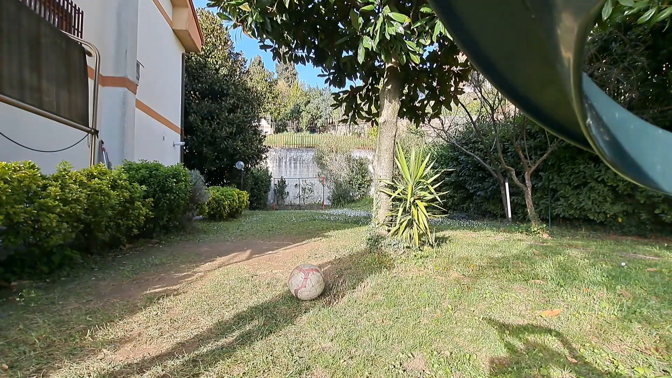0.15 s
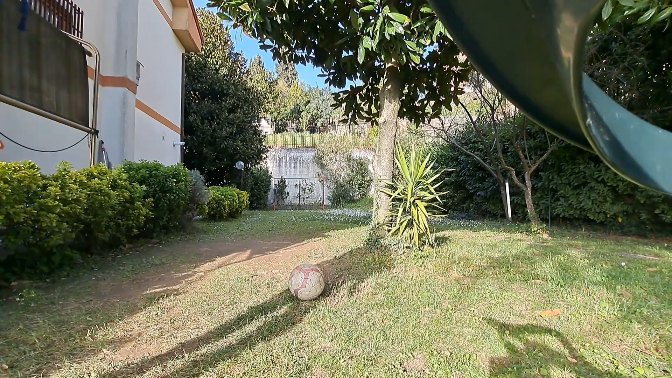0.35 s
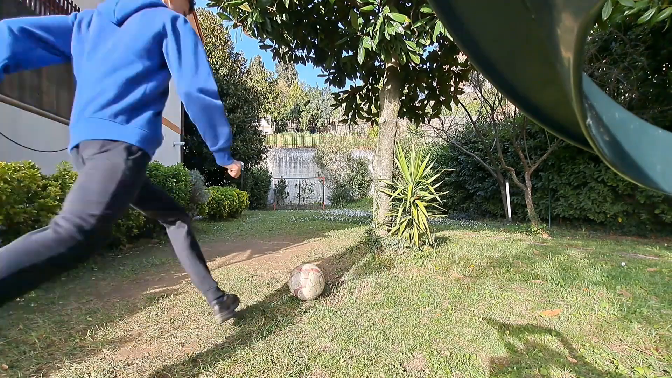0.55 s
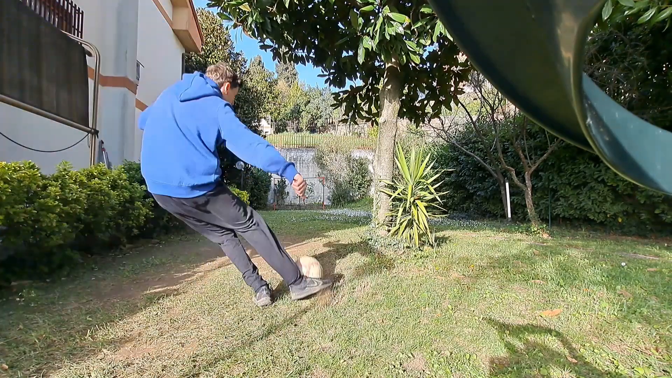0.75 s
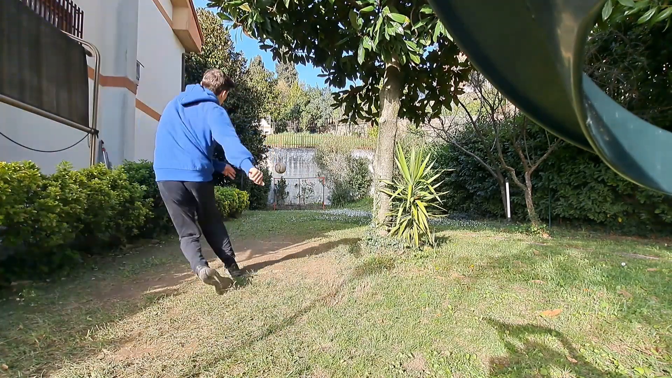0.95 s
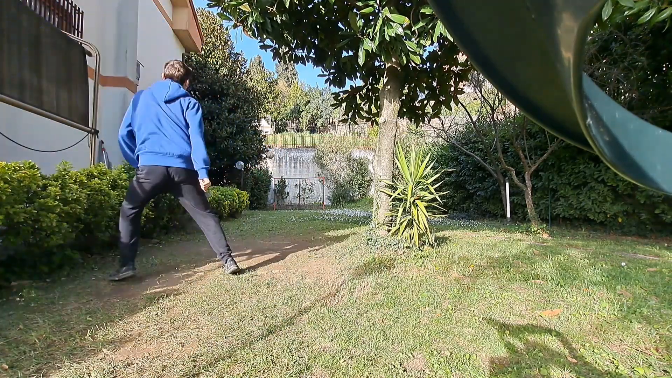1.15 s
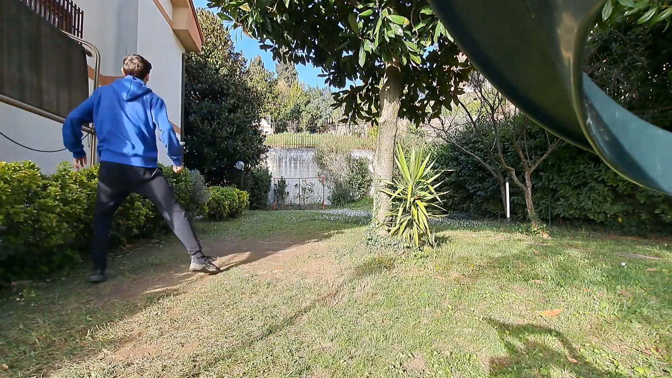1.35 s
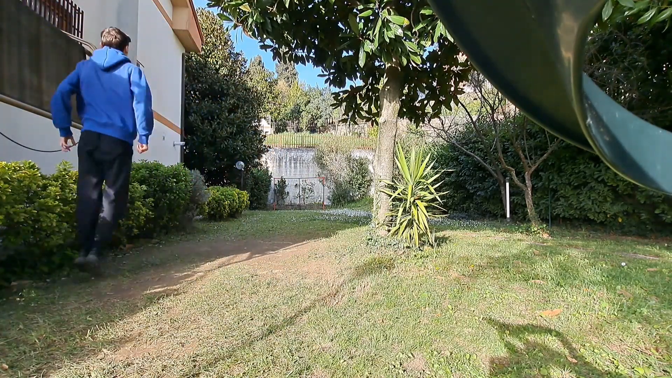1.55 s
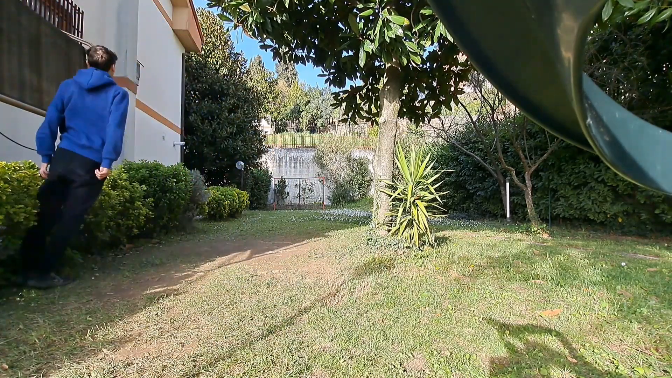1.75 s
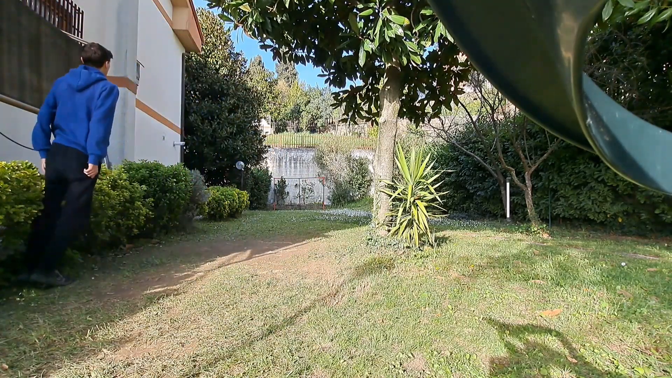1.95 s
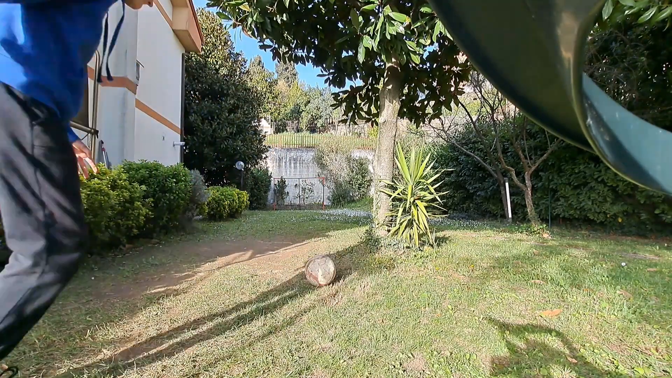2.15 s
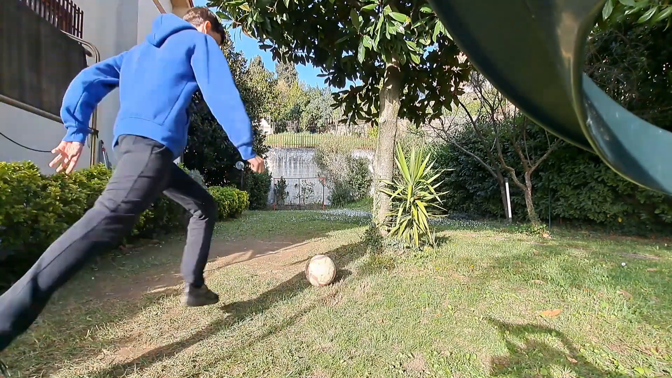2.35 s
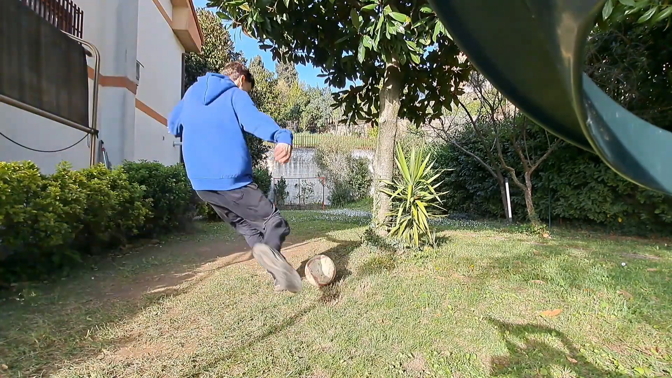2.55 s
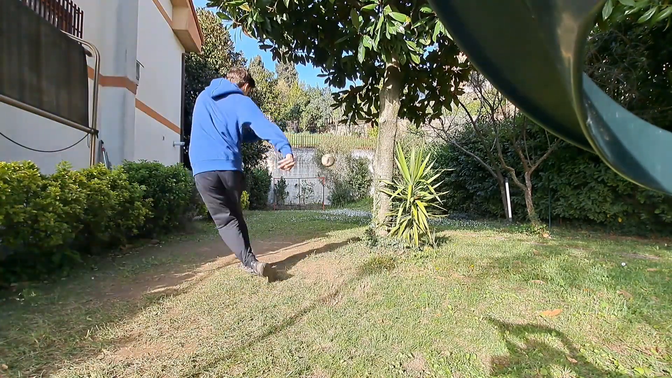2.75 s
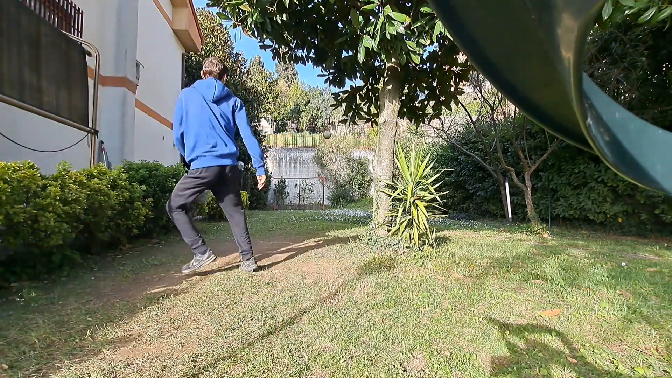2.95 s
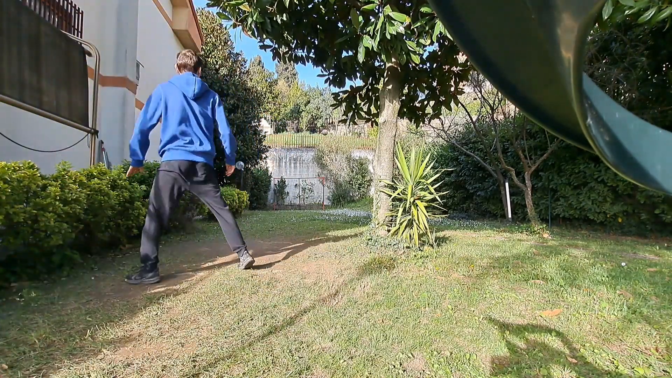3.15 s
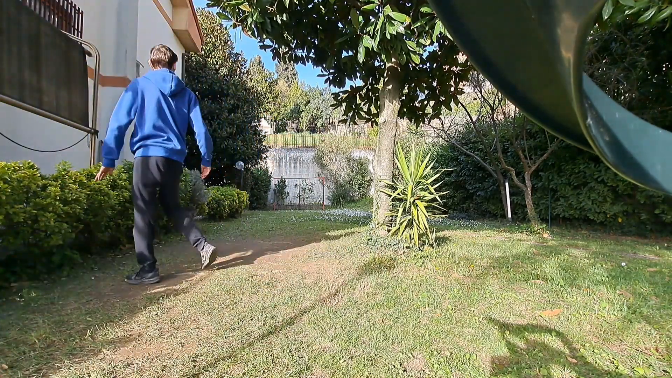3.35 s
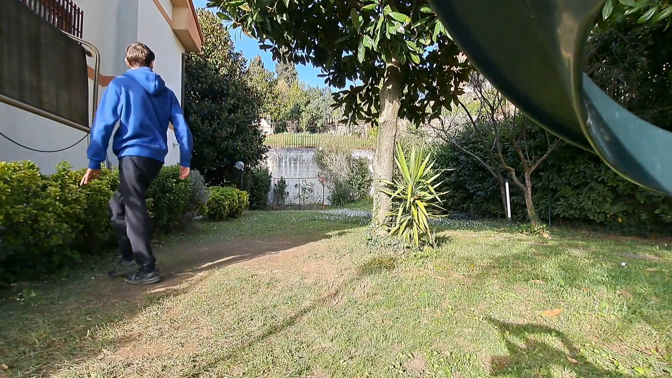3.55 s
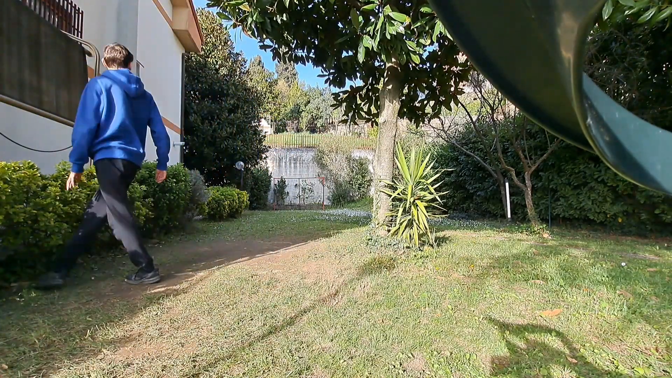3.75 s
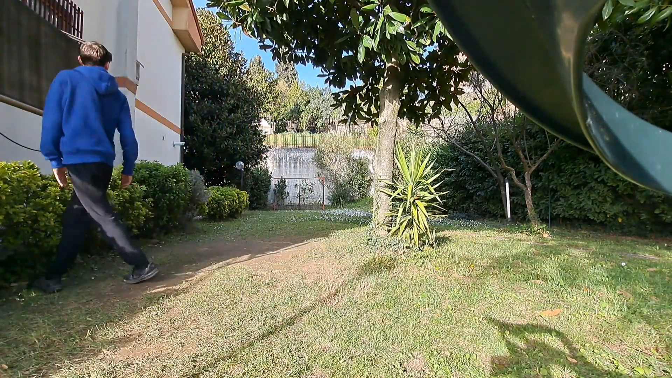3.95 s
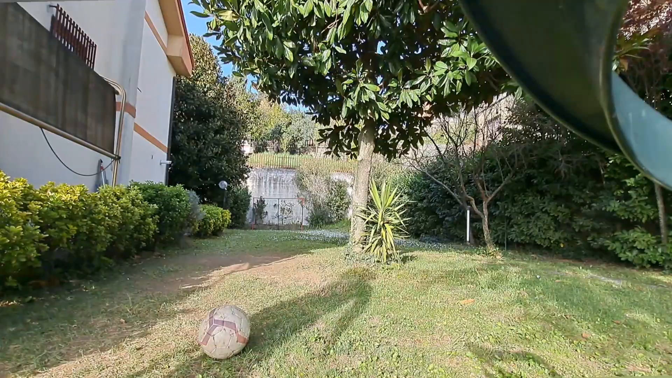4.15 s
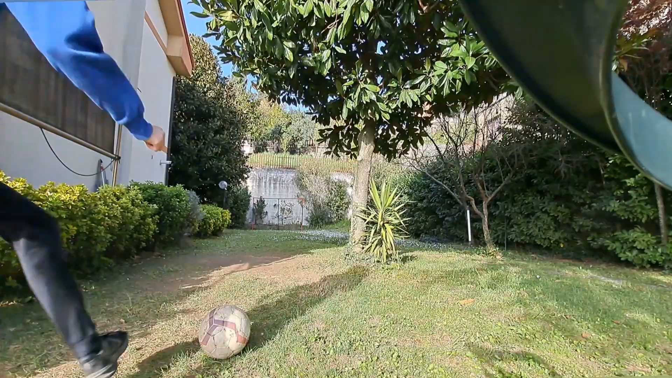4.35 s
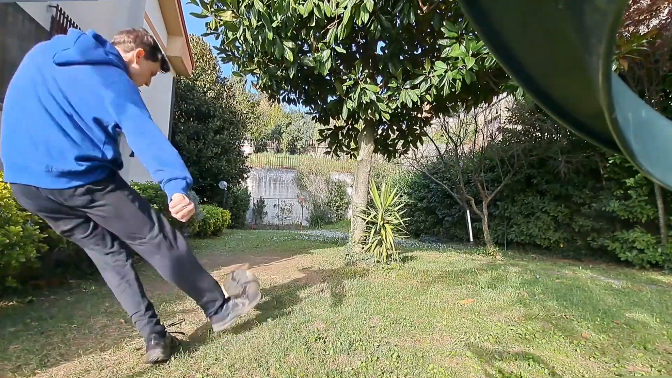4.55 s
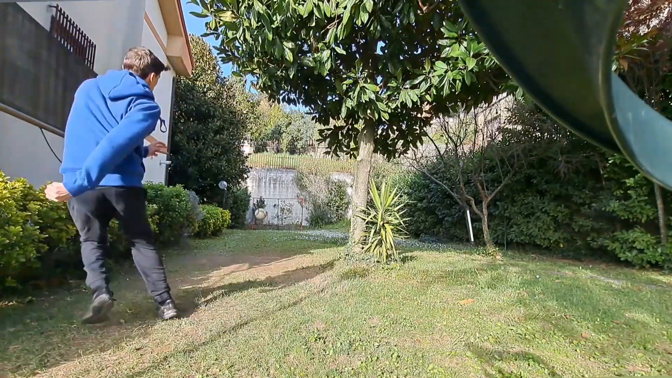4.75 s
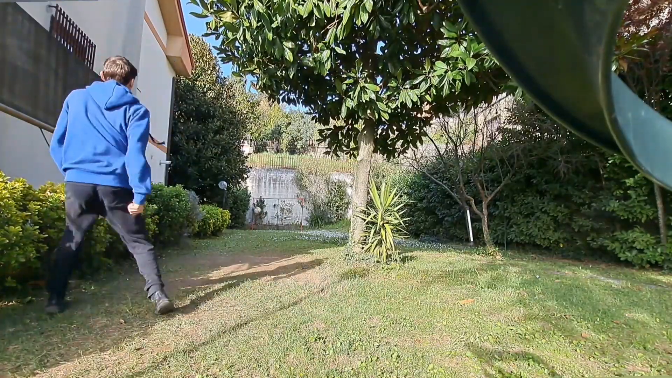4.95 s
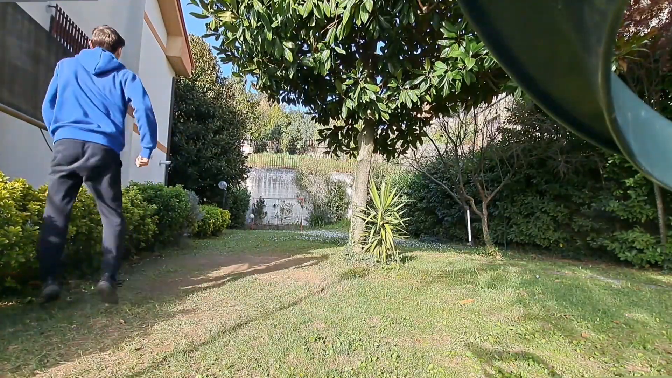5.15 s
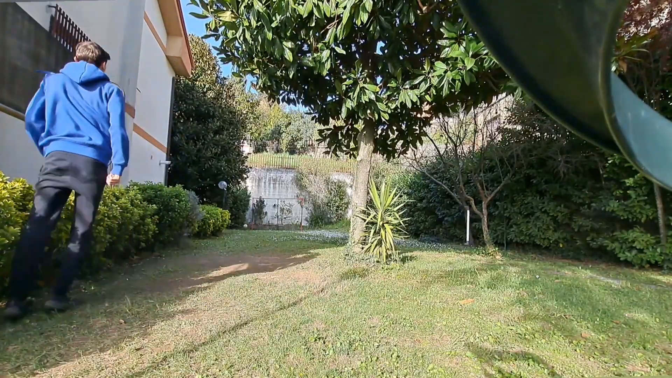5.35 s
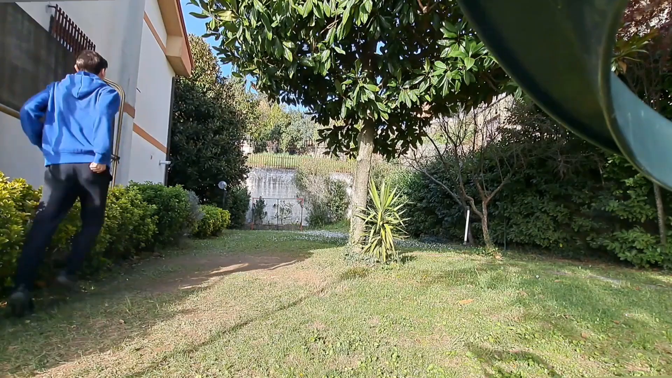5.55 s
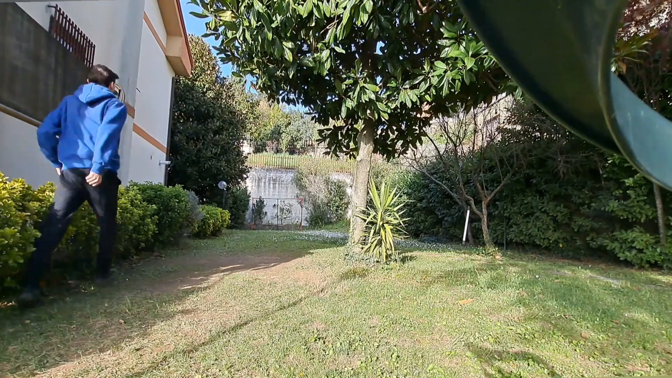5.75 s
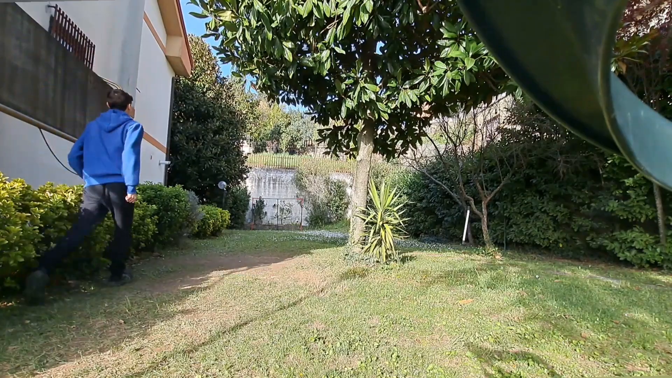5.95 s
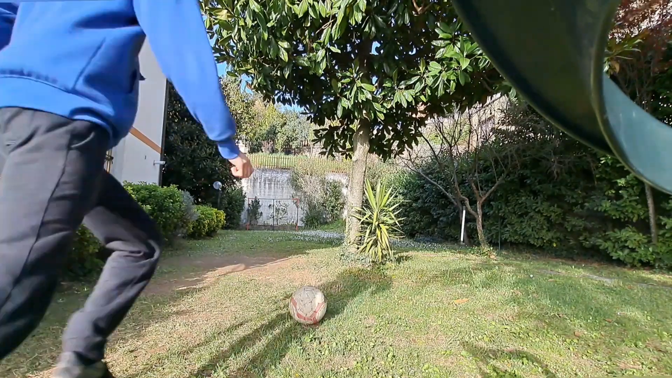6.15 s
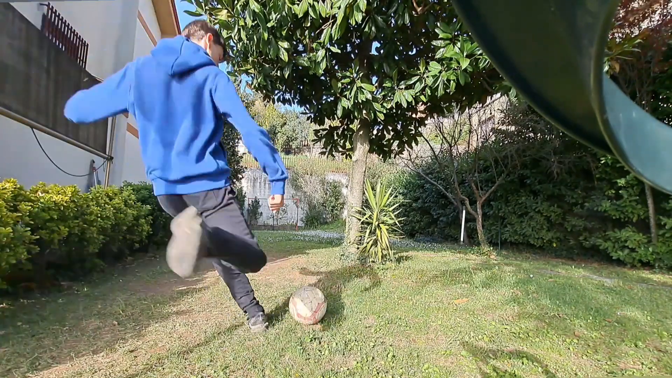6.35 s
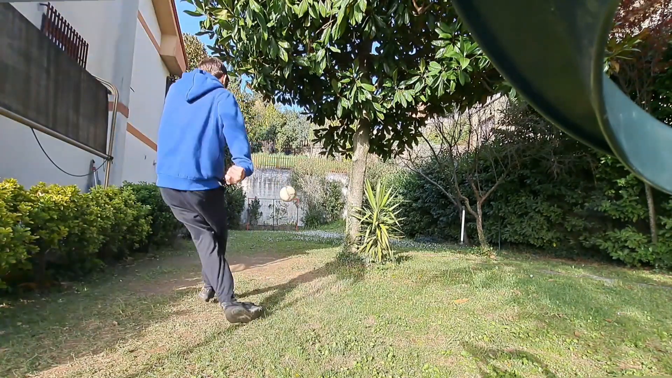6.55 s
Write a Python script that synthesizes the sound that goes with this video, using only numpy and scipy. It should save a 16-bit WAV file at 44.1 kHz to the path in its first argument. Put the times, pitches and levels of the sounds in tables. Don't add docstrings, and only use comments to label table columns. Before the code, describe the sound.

A quiet walled garden with faint air hiss, heard by a microphone close to the ball. From 0 s, soft running footfalls and grass swishes at left lead to a sole tearing grass and a huge, sharp football thump at 0.78 s, with crack, wall slap and low boom. Scuffing steps follow, crunching dirt most clearly at 1.5 s. A tiny dropout at 2.06 s cuts to a new run-up; the second kick bangs at 2.6 s, with a dull step just after. Around 3.25 s a very faint engine drones far off; a gritty step lands at 3.9 s. After a cut at 4.03 s, quick steps bring the third kick at 4.58 s, then shuffles and softer stamps to 5.9 s. Another cut at 5.99 s, swishing strides, and the fourth kick cracks at 6.46 s, preceded by a bright grassy scuff, its boom and crunch trailing to the end.

```python
import sys
import numpy as np
from scipy import signal
from scipy.fft import rfft, irfft, next_fast_len
from scipy.io import wavfile
from scipy.ndimage import uniform_filter1d

SR = 44100
rng = np.random.default_rng(int(sys.argv[2]) if len(sys.argv) > 2 else 0)


def int16_out(signal):
    q = np.round(np.clip(np.atleast_2d(signal).T, -1, 1) * 32767)
    wavfile.write(sys.argv[1], SR, q.astype(np.int16))


def voltage_ratio(level):
    return 10 ** (np.asarray(level, float) / 20)


N = 295029

# (time [s], push [dB], contact [ms], grit rattle [dB], wall slap [dB])
KICKS = [
    (0.7843, -2.8, 2.3, -35, -11.9),
    (2.6073, -1.6, 2.5, -36, -11.2),
    (4.5773, -1.1, 2.0, -36, -9.5),
    (6.4621, -1.2, 2.15, -33, -10.7),
]
SCENE_ENDS_S = [2.063, 4.025, 5.994]
# (frequency [Hz], density [dB per Hz])
DIRT = [(590, -36), (1000, -8), (1640, 0), (2550, -2.5), (2770, -3.5), (3200, -4.5), (3900, -5),
        (7000, -13), (9100, -44), (15400, -120)]
SOIL = [(260, -31.5), (450, -4), (699, -4.5), (1100, -10.5), (1470, -13), (2600, -22.5), (3380, -53.5),
        (5720, -120)]
GRASS = [(2650, -35.5), (4500, -5.5), (5280, -4), (6460, -8.5), (7410, 1.5), (8970, -7), (12300, -4),
         (15100, -11.5), (16000, -21)]
# (frequency [Hz], likeness [0-1])
ALIKE = [(60, 0.018), (180, 0), (550, 0.22), (1650, 0), (4970, 0), (15000, 0.043)]


def unit(x):
    return x / np.sqrt(np.mean(x ** 2) + 1e-20)


def along(points, hz):
    f, v = np.transpose(points)
    return np.interp(np.log(hz + 1), np.log(f + 1), v)


def filtered(x, response):
    m = next_fast_len(N + SR // 2)
    hz = np.fft.rfftfreq(m, 1 / SR)
    return irfft(rfft(x, m) * response(hz), m)[..., :N]


def sides(db):
    return voltage_ratio(np.multiply.outer([.5, -.5], db))


def add(track, s, piece):
    part = track[..., round(s * SR):][..., :piece.shape[-1]]
    part += piece[..., :part.shape[-1]]


def rush(spectrum, grit_db, patchy_db=2.5, alike=ALIKE):
    contact_size = np.repeat(rng.exponential(size=N // 24 + 1), 24)[:N]
    grains = voltage_ratio(grit_db * contact_size) * rng.standard_normal((2, N))
    z = signal.stft(grains, nperseg=256)[2]
    field = uniform_filter1d(rng.standard_normal(z.shape[1:]), size=4, axis=0)
    field = uniform_filter1d(field, size=6, axis=1)
    pair = signal.istft(z * voltage_ratio(patchy_db * unit(field)), nperseg=256)[1][:, :N]

    def mid_side(hz):
        turn = np.arccos(np.clip(along(alike, hz), -1, 1)) / 2
        return voltage_ratio(along(spectrum, hz)) * [np.cos(turn), np.sin(turn)]

    mid, side = filtered(pair, mid_side)
    return unit(np.array([mid + side, mid - side]))


def snaps(table, sharp, passes):
    out, t = np.zeros((2, N)), np.arange(SR // 10) / SR
    for s, db, centre_hz, t60_s in table:
        stage = np.concatenate(signal.iirpeak(min(centre_hz, 15000), sharp, SR))
        common, apart = rng.standard_normal((2, len(t)))
        pair = [common + 0.4 * apart, common - 0.26 * apart]
        burst = unit(signal.sosfilt([stage] * passes, pair))
        envelope = voltage_ratio(db - 9.5 - 60 * t / t60_s) * np.minimum(t / 0.0008, 1)
        add(out, s - .0005, envelope * burst)
    return out


def strokes(table, rise, edge):
    level = np.zeros(N)
    for s, db, length_s in table:
        u = np.arange(round(2 * length_s * SR)) / (length_s * SR)
        add(level, s, voltage_ratio(db) * np.minimum(u / rise, 1) * np.exp(-(1.103 * u) ** edge))
    return level


def swells(events):
    t, power = np.arange(N) / SR, np.zeros(N)
    edges = np.searchsorted(t, [0, *SCENE_ENDS_S, N / SR])
    for s, db, rise_s, fade_s in events:
        span = slice(*edges[np.searchsorted(SCENE_ENDS_S, s):][:2])
        late = t[span] - s
        decay = np.maximum(-late / max(rise_s, 1e-3), late / max(fade_s, 1e-3))
        power[span] += voltage_ratio(2 * db - 120 * decay)
    return np.sqrt(power)


def after_strikes(delay_s, over_db, rise_s, fade_s, more_db=(0, 0, 0, 0)):
    return [(s + delay_s, db + over_db + more, rise_s, fade_s)
            for (s, db, *_), more in zip(KICKS, more_db)]


def contacts(sudden, soft, rise_s, rise, layer, lasts):
    def level(db, over):
        return db + (0, *over)[layer]

    return ([(s, level(db, over), rise_s, lasts * t60) for s, db, *over, t60 in sudden]
            + [(s, level(db, over), rise * t60, lasts * t60) for s, db, *over, t60 in soft])


def still_air():
    # (frequency [Hz], density [dB per Hz])
    air_spectrum = [(290, -30), (500, -4.5), (773, -11.5), (1020, -7.5), (1460, -20.5), (3250, -23.5),
                    (16000, -26.5)]
    noise = rng.standard_normal((2, N))
    return voltage_ratio(-83) * filtered(noise, lambda hz: unit(voltage_ratio(along(air_spectrum, hz))))


def engine():
    # (time [s], level [dB rms], length [s])
    passing = [
        (3.25, -69, .38),
    ]
    # (frequency [Hz], density [dB per Hz])
    drone_spectrum = [(130, -60), (151, -8), (157, 0), (163, -8), (190, -60)]
    drone = filtered(rng.standard_normal(N), lambda hz: voltage_ratio(along(drone_spectrum, hz)))
    return strokes(passing, rise=.2, edge=6) * unit(drone)


def boom():
    # (time [s], boom [dB], knock over it [dB], t60 [s])
    stamps = [(.272, -38.5, -18.5, 3.1), (.655, -42.5, -5, 1.7), (1.225, -57, -5, .6),
              (1.52, -37.5, -2, 1.5), (1.945, -44.5, -6, 0.95), (2.35, -55.5, 2, 0.85), (2.5, -45, 5, 0.55),
              (2.754, -31, -4, 0.47), (3.122, -52.5, -4.5, 0.81), (3.715, -55.5, 7.5, 4.6),
              (3.94, -31, -10.5, 0.74), (4.14, -47, -13, .8), (4.325, -43.5, -8, .7), (4.464, -39, 6, 0.32),
              (4.945, -39.5, -19.5, 0.5), (5.535, -41, -3.5, 0.21), (5.66, -37, -3, 0.71),
              (6.003, -39.5, -14.5, 0.78), (6.35, -37, -6.5, .9)]
    # (time [s], boom [dB], knock over it [dB], t60 [s])
    strides = [(0.061, -50.5, -7.5, 0.91), (.42, -35, -20.5, 0.61), (.55, -51, -1.5, 0.62),
               (1.06, -39, -13, 0.87), (1.41, -47, -21, 1), (1.48, -57, 8.5, 0.38),
               (2.87, -41, -15.5, 0.94), (5.76, -44, -7, 0.43), (.16, -44, -18, 0.67),
               (1.7, -45.5, -5, 0.64), (1.84, -54, -12, .3), (2.12, -58, -8, 1), (2.28, -59, -9, 1.04),
               (4.21, -51, -1, 0.26), (4.725, -33, -4, 0.59), (5.07, -54, -14.5, 0.44),
               (5.399, -48, -17.5, 0.88), (5.6, -56, 6.5, .8), (5.92, -53, -6.5, 0.94),
               (6.208, -43.5, -4, 2), (6.595, -28, -17, 0.35)]
    # (frequency [Hz], density [dB per Hz])
    ground_spectrum = [(20, -42.5), (34, -12), (47, -1), (59, 3), (86, 2), (118, -2), (141, -2),
                       (162, -14.5), (211, -20.5), (230, -20.5), (300, -45), (510, -120)]
    knock_spectrum = [(100, -30), (170, -2.5), (210, -11), (280, -9.5), (650, -25), (840, -61.5),
                      (1430, -120)]
    yard_spectrum = [(70, -40), (100, -3), (128, 0), (170, -22), (260, -120)]
    # (frequency [Hz], likeness [0-1])
    low_alike = [(30, 0.6), (130, 0.7), (300, .75), (700, 0.6)]
    # (delay [s], level over the push [dB], rise t60 [s], fade t60 [s])
    yard_ring = (0.12, -27, 0.09, 0.79)
    treads = stamps, strides, 0.069, 0.27

    low = swells(contacts(*treads, layer=0, lasts=1)
                 + after_strikes(delay_s=0.12, over_db=-25, rise_s=0.07, fade_s=0.75))
    knock = swells(contacts(*treads, layer=1, lasts=.65)
                   + after_strikes(delay_s=.04, over_db=-29, rise_s=.06, fade_s=0.2657)
                   + after_strikes(delay_s=0.18, over_db=-43, rise_s=0.54, fade_s=0.83))
    low, knock = np.hypot(low, voltage_ratio(-65)), np.hypot(knock, voltage_ratio(-72.5))
    ground = low * rush(ground_spectrum, 0, patchy_db=1.2, alike=low_alike)
    ground = ground + knock * rush(knock_spectrum, 0.96, alike=low_alike)

    lull_s, lull_width_s, lull_db = 5.254, .016, -22
    lull = voltage_ratio(lull_db * np.exp(-((np.arange(N) / SR - lull_s) / lull_width_s) ** 2))
    yard = swells(after_strikes(*yard_ring)) * rush(yard_spectrum, 0, patchy_db=.5, alike=low_alike)
    return lull * ground + yard


def brushing():
    # (time [s], dirt [dB], soil over it [dB], leaves over it [dB], t60 [s])
    plants = [(.655, -57.5, 7, 3.5, 0.57), (1.226, -51.5, -1, -6, 0.32), (2.072, -82, 2, 14, 2),
              (5.575, -66.5, 12.5, 3, 0.69), (1.478, -39.5, -7.5, -4, 0.91), (1.518, -33, -2.5, -6.5, 0.71),
              (1.925, -52, -1.5, -5.5, 3.7), (.845, -55.5, 8, -20, 0.72), (2.497, -62, 11, -1, 1.42),
              (2.725, -60, 17, -12, .5), (2.752, -57, 13, -12, .25), (3.709, -56, -3.5, 4, 4),
              (3.735, -46, -2.5, -3, 2.74), (4.2, -80, 12, 6, .8), (4.295, -74, 16, 6, .4),
              (4.461, -58.5, 2.5, 2.5, 1.66), (4.92, -53.5, -5.5, -0.5, 0.34), (5.52, -63, 8.5, 0.5, 1.7),
              (5.64, -52.5, 1.5, -3, 0.83), (6.01, -62.5, 8.5, 1, .6), (6.344, -58.5, 9, 0, 1.04)]
    # (time [s], dirt [dB], soil over it [dB], leaves over it [dB], t60 [s])
    shuffles = [(.06, -64, -7, 3, 0.44), (.35, -61, -4, 2, 0.46), (.56, -58.5, -2.5, 1.5, 0.46),
                (.91, -62.5, 20.5, -18, 0.58), (.975, -51, 3, 3, 0.32), (1.41, -59.5, -13.5, 9, 0.29),
                (1.758, -53, -2, 3.5, 0.47), (1.455, -54.5, -2, -2, 0.43), (2.136, -65.5, -16.5, 2.5, 0.47),
                (2.38, -61.5, -1, 1.5, 0.32), (2.785, -57, 1, 0, 0.31), (3.14, -72, 3, 4.5, .3),
                (3.95, -49, -3.5, -0.5, 0.45), (4.152, -67, -3, 4.5, 1.4), (4.34, -58.5, -4.5, 2, 0.48),
                (4.73, -59, 16, -2, .33), (5.147, -75.5, -3.5, 5, 1.12), (5.383, -71.5, -9.5, 2.5, 0.78),
                (5.9, -68.5, 4, 4.5, 3), (6.21, -64.5, 7, 5, 0.44), (6.3, -65, 3.5, -10, 1),
                (6.6, -63.5, 14, -15, 0.6), (6.645, -58, -2, 5, .6)]
    # (time [s], peak [dB], centre [Hz], t60 [s])
    crunches = [(0.051, -43, 2120, 0.077), (0.649, -40, 703, 0.05), (0.896, -39, 700, 0.05),
                (0.994, -31, 900, 0.025), (1.478, -27, 1560, 0.064), (1.515, -27.5, 3320, 0.08),
                (2.503, -32, 770, 0.11), (2.717, -34, 1400, 0.05), (2.7465, -25, 900, 0.03),
                (2.7545, -25, 800, 0.04), (3.919, -28.5, 1640, 0.052), (4.143, -47, 2020, 0.04),
                (4.298, -48, 900, .04), (4.336, -38, 2200, 0.12), (4.355, -40, 2100, .06),
                (4.458, -44, 5500, .1), (4.464, -33.5, 719, 0.069), (4.703, -38, 600, .05),
                (4.723, -27, 900, 0.05), (4.918, -46, 670, 0.14), (5.521, -39, 770, 0.094),
                (5.589, -42, 6900, 0.39), (5.634, -29, 800, 0.06), (5.785, -50, 2400, .12),
                (5.855, -36.5, 800, 0.064), (5.875, -45, 900, 0.05), (5.93, -50, 1100, .12),
                (6.345, -35, 905, 0.067), (6.585, -38, 500, .06)]
    # (time [s], peak [dB], centre [Hz], t60 [s])
    stalks = [(0.0303, -44, 2390, 0.012), (0.1401, -52, 11740, 0.011), (0.177, -46, 11820, 0.008),
              (0.2359, -49.5, 7420, 0.014), (1.7294, -56, 1414, 0.008), (1.7594, -42, 2480, 0.0072),
              (1.7694, -38.5, 12470, 0.0075), (2.5731, -37, 1580, 0.0084), (3.1208, -57, 7670, 0.0089),
              (3.7314, -36, 1540, 0.0077), (3.7414, -46, 1685, 0.0072), (4.0736, -53, 12700, 0.008),
              (4.0956, -57, 12520, 0.0057), (6.1734, -57, 1398, 0.008), (6.1853, -40, 13500, 0.008),
              (6.3026, -28, 2150, 0.0071), (6.3894, -46.5, 1420, 0.008), (6.4509, -7, 3000, 0.0059)]
    spray_db = [-1, 1, -7, 0]
    soles = plants, shuffles, 0.043, .6

    dirt = swells(contacts(*soles, layer=0, lasts=1)
                  + after_strikes(delay_s=.025, over_db=-43, rise_s=.03, fade_s=.45, more_db=spray_db))
    soil = swells(contacts(*soles, layer=1, lasts=0.87)
                  + after_strikes(delay_s=.011, over_db=-30, rise_s=.013, fade_s=0.2071))
    leaves = swells(contacts(*soles, layer=2, lasts=.8)
                    + after_strikes(delay_s=.025, over_db=-53, rise_s=.031, fade_s=.3, more_db=spray_db))
    beds = dirt * rush(DIRT, grit_db=1.5, patchy_db=2.2)
    beds = beds + soil * rush(SOIL, grit_db=1.5, patchy_db=3)
    beds = beds + leaves * rush(GRASS, grit_db=2.0, patchy_db=3)
    return beds + snaps(crunches, sharp=2.8, passes=2) + voltage_ratio(1.0) * snaps(stalks, sharp=.6, passes=1)


def swishes():
    # (time [s], level [dB rms], length [s])
    sweeps = [(.048, -56, 0.059), (.138, -62, 0.029), (.318, -50, 0.039), (.525, -47, 0.057),
              (.942, -61, .05), (1.17, -72, .04), (1.218, -57, .055), (1.75, -56, .04),
              (2.115, -57.5, 0.055), (2.345, -49.5, 0.054), (4.322, -49, 0.052), (5.11, -70.5, 0.061),
              (5.36, -68.5, 0.052), (5.9995, -44, 0.022), (6.198, -46, 0.046)]
    # (frequency [Hz], density [dB per Hz])
    blade_spectrum = [(410, -32.5), (700, -7), (1350, -14.5), (2100, -3.5), (2590, -4), (2840, -12),
                      (3840, -8.5), (4320, -13), (7490, -4), (8880, -7), (13100, -0.5), (16000, -14.5)]
    # (frequency [Hz], left over right [dB])
    shading = [(1500, 0), (5000, 3), (8500, 7.5), (12500, 13)]
    blades = rush(blade_spectrum, grit_db=2.0, patchy_db=1.0)
    blades = filtered(blades, lambda hz: sides(along(shading, hz)))
    return strokes(sweeps, rise=0.21, edge=4.8) * voltage_ratio(2.2) * unit(blades)


def push(db, ms):
    return -voltage_ratio(db) * np.sin(np.linspace(0, np.pi, max(round(ms * SR / 1000), 4))) ** 2


def rebound(hz, low_hz, low_width, low_db, up_hz, up_width, up_db, lag):
    low = voltage_ratio(low_db) * 1j * hz * low_width / (low_hz ** 2 - hz ** 2 + 1j * hz * low_width)
    upper_drive = voltage_ratio(up_db) * (1j * hz - lag * up_hz) * up_width
    upper = upper_drive / (up_hz ** 2 - hz ** 2 + 1j * hz * up_width)
    direct = 1j * hz / (30 + 1j * hz)
    return direct - low + upper


def walls(hz):
    # (delay [ms], share of the thump [ratio])
    echoes = [(17.1, 0.276), (37.2, 0.185), (42.6, -0.125), (54.8, -0.121), (63.1, -0.199), (74.4, -0.054),
              (90.9, -0.058), (98.0, -0.042), (108.9, -0.073), (122.0, 0.1)]
    returned = sum(share * np.exp(-2j * np.pi * hz * ms / 1000) for ms, share in echoes)
    return 1 + returned / (1 + 1j * hz / 450) ** 2


def falls():
    # (time [s], push [dB], contact [ms])
    footfalls = [(0.279, -33, 5), (.385, -32, 5), (.497, -32, 5), (.648, -40, 2.1), (.903, -24, 5),
                 (1.516, -27.5, 2.7), (1.948, -48, 6.1), (2.494, -34, 3.4), (2.747, -24, 1.2),
                 (3.921, -28, 2.6), (3.962, -23, 5), (4.143, -44, 6), (4.196, -36, 7), (4.458, -24.5, 2.84),
                 (4.721, -27, 3), (4.921, -39, 1.78), (5.529, -30, 4.2), (5.651, -32, 5), (5.735, -32, 6),
                 (5.882, -38, 5), (6.343, -26, 3.5)]
    pushes = np.zeros(N)
    for s, db, ms in footfalls:
        add(pushes, s, push(db, ms))
    ring = filtered(pushes, lambda hz: rebound(hz, low_hz=66, low_width=9, low_db=14.0,
                                               up_hz=122, up_width=12, up_db=6.5, lag=.3))
    for s in SCENE_ENDS_S:
        ring[round(s * SR):][:SR // 10] = 0
    return ring


def kicks(casing):
    # (time [s], peak [dB], centre [Hz], t60
    # [s])
    cracks = [(.7849, -6, 1300, 0.009), (.785, -10, 3500, .006), (.7851, -10, 7500, .006),
              (2.6077, -7.5, 4500, .008), (2.6085, -17, 1500, .012), (4.5777, -14, 1700, 0.01),
              (4.5779, -17, 8000, .012), (4.5925, -31, 6500, .012), (6.4625, -4, 2400, .008),
              (6.4627, -12, 7500, .008)]
    pushes, slaps, rattle = np.zeros(N), np.zeros(N), np.zeros(N)
    t = np.arange(SR // 10) / SR
    for s, db, ms, rattle_db, slap_db in KICKS:
        add(pushes, s, push(db, ms))
        add(slaps, s + .0146, -push(slap_db, 1.8))
        add(slaps, s + .0164, push(slap_db - 6, 1.7))
        add(rattle, s, voltage_ratio(rattle_db - 60 * t / 0.05) * np.minimum(t / 0.00035, 1))
    body = filtered(pushes, lambda hz: walls(hz) * rebound(hz, low_hz=67.8, low_width=12, low_db=17.6,
                                                           up_hz=127.8, up_width=18, up_db=13.3, lag=.19))
    return body + sides(6)[:, None] * slaps + rattle * casing + snaps(cracks, sharp=1.1, passes=2)


def strike():
    # (time [s], level [dB rms], length [s])
    scuffs = [(0.7682, -41, 0.0031), (.7732, -19.5, 0.0066), (2.6, -49, 0.0046), (4.571, -48, 0.0099),
              (6.4454, -35, 0.0034), (6.4495, -25.5, 0.012)]
    # (frequency [Hz], likeness [0-1])
    near = [(500, 1), (2000, 0.2), (15000, 0.97)]
    grit = rush(DIRT, grit_db=3.0, alike=near)
    blades = rush(GRASS, grit_db=4.5, alike=near)
    torn = grit + voltage_ratio(3) * blades + voltage_ratio(-5) * rush(SOIL, grit_db=2, alike=near)
    return strokes(scuffs, rise=0.16, edge=2.2) * torn + kicks(grit + voltage_ratio(-6) * blades)


def scene():
    # (frequency [Hz], left over right [dB])
    ports = [(60, -1.8), (290, -2.5), (1000, -2.5), (2500, -3.5), (5000, -6.5), (8000, -1.5), (12000, 1),
             (15000, 2)]
    ahead = strike() + falls() + boom() + brushing() + engine()
    return filtered(ahead, lambda hz: sides(along(ports, hz))) + swishes() + still_air()


def low_pass(x):
    return signal.sosfilt(signal.butter(12, 16450, fs=SR, output="sos"), x)


def record(dry):
    # (start [s], end [s], level [dB])
    dropouts = [
        (2.055, 2.066, -17.5),
        (4.018, 4.031, -26),
        (5.989, 5.9987, -41),
    ]
    gain = np.ones(N)
    for start_s, end_s, db in dropouts:
        gain[round(start_s * SR):round(end_s * SR)] = voltage_ratio(db)
    x = dry * uniform_filter1d(gain, size=40)
    x = x / (1 + np.abs(x / 1.05) ** 8) ** (1 / 8)
    x = filtered(x, lambda hz: np.clip((16300 - hz) / 500, 0, 1))
    return low_pass(x)


dry = scene()
out = record(dry)
int16_out(out)
```